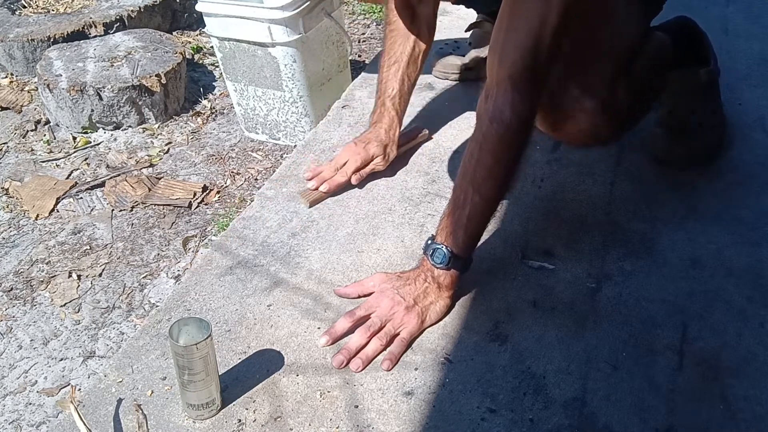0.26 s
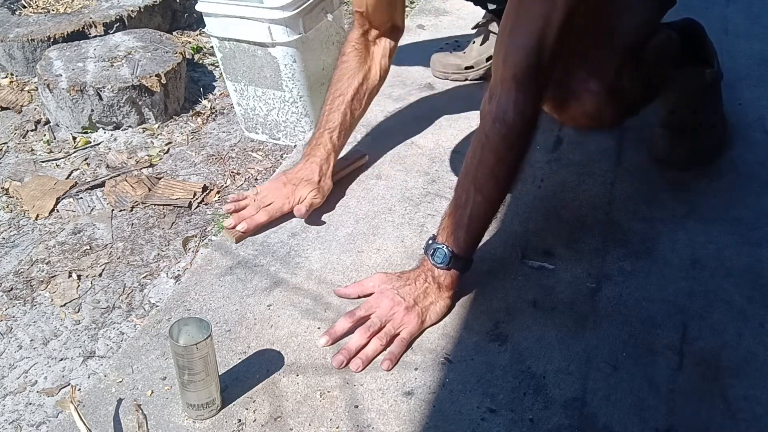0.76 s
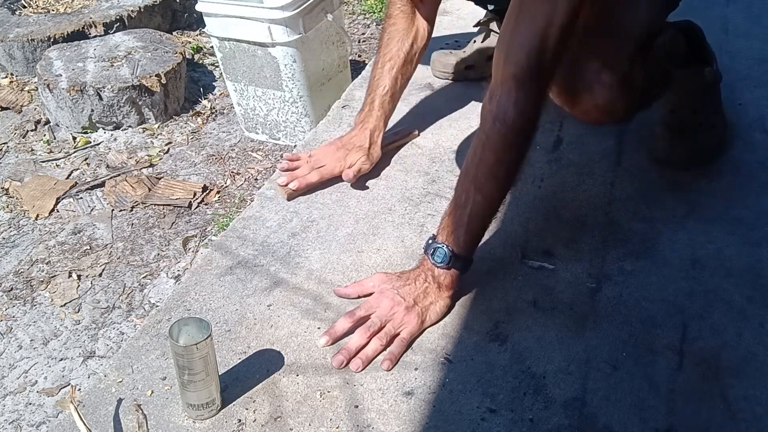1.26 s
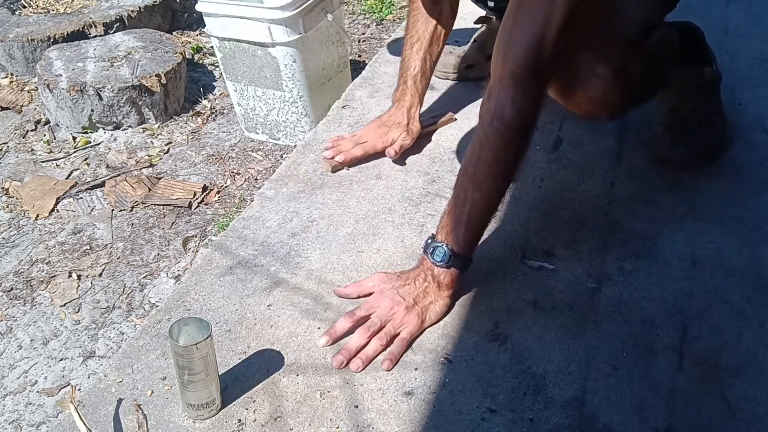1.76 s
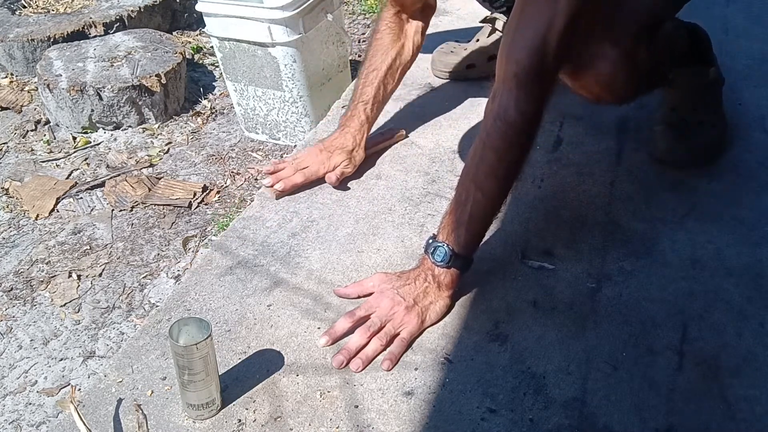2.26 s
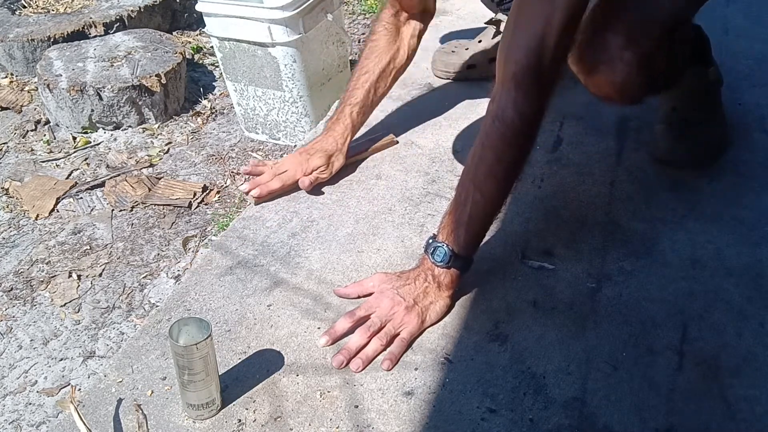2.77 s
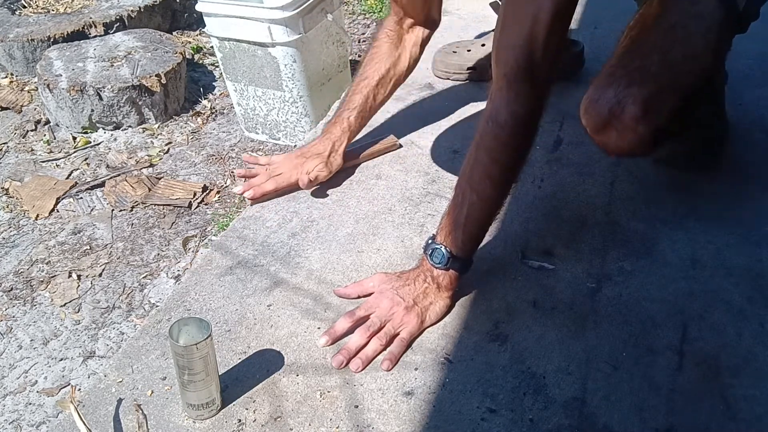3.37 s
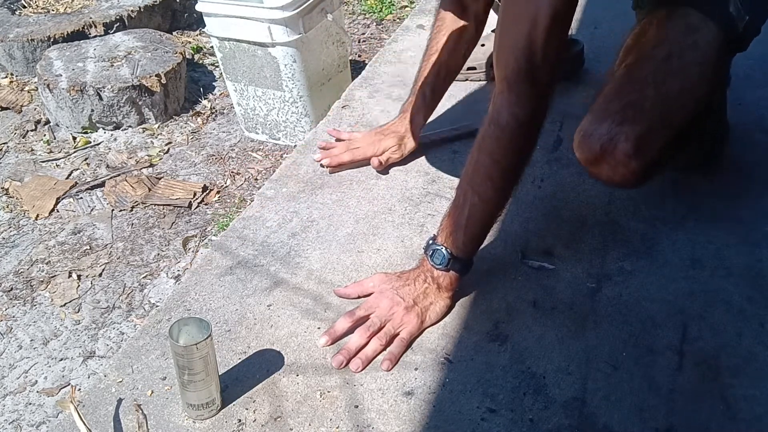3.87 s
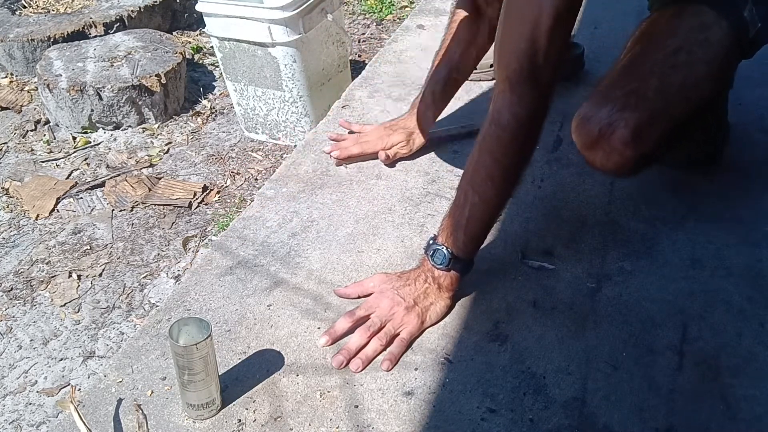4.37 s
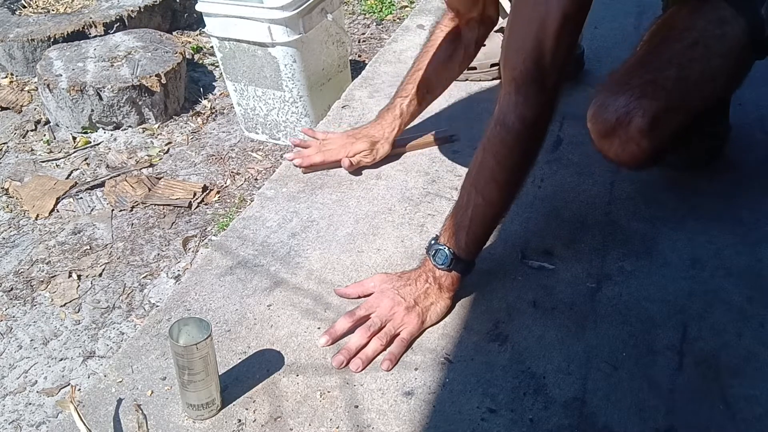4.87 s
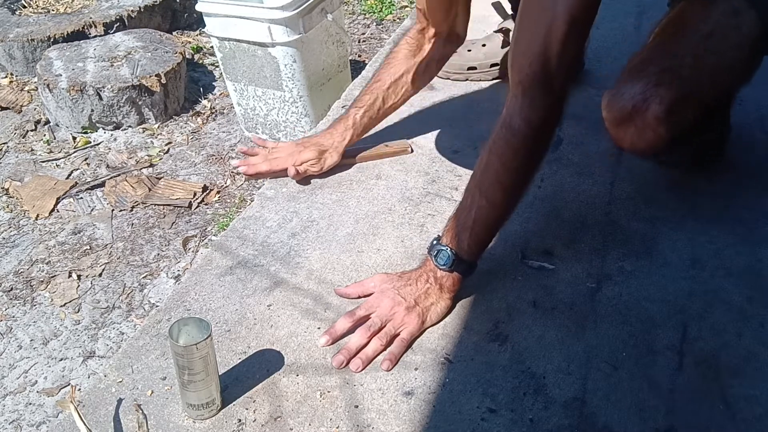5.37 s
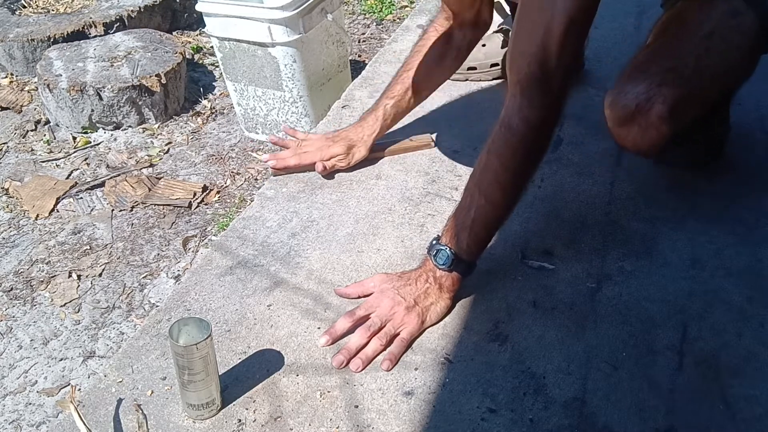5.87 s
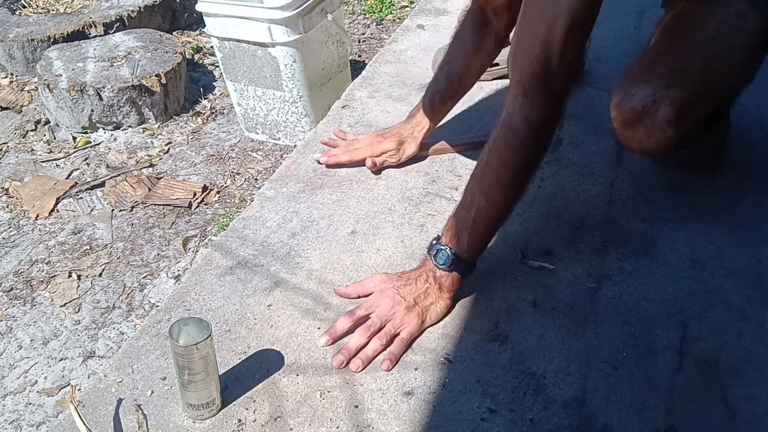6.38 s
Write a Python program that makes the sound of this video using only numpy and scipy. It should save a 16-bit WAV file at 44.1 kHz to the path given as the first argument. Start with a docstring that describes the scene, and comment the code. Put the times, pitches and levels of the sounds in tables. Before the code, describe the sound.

A board rubs to and fro on rough concrete in a yard, slightly right of centre and close to the microphone. The opening is loud and uneven: dry clacks, chattering wood, hissing grit, a few singing squeaks. Then the strokes turn soft, brisk and even, like fast sanding. One last knock and a longer scrape break in at the end. Low hum, quiet air and soft wind lie beneath.

```python
"""A short wooden board is pushed to and fro on a concrete slab, rolling a cotton wad to make fire by friction.
At first bare wood knocks and scrapes: each contact shakes ringing bends of the board, and loose grit hisses.
Then come about seven even rolls a second on the wad, and at the end a last knock and a few scrapes.
At times an edge sings or the air gap sounds hollow. A wall and bucket scatter it all, over hum, air and breeze.
Noise makes the rubbing, fading sines make the ringing. Table levels are those before the yard and microphone."""
import sys
import numpy as np
from scipy import signal
from scipy.fft import rfft, irfft
from scipy.io import wavfile

SR = 44100
rng = np.random.default_rng(int(sys.argv[2]) if len(sys.argv) > 2 else 0)


def store_wav(level_fs):
    """Save 16-bit WAV to argv[1]."""
    pcm = np.round(np.clip(np.atleast_2d(level_fs), -1, 1) * 32767)
    wavfile.write(sys.argv[1], SR, pcm.T.astype(np.int16))


N = 291942
TIME = np.arange(N) / SR


def undb(db):
    """Turn decibels into a gain."""
    return 10 ** (np.asarray(db) / 20)


def unit_rms(x):
    """Scale a sound to an rms of one."""
    return x / np.sqrt(np.mean(x ** 2))


def unit_energy(x):
    """Scale each channel to an energy (sum of squares) of one."""
    return x / np.sqrt(np.sum(x ** 2, axis=-1, keepdims=True))


def band(x, lo_hz, hi_hz, order=2):
    """Keep only the frequencies between two limits."""
    limits_hz = [lo_hz, min(hi_hz, 0.45 * SR)]
    return signal.sosfilt(signal.butter(order, limits_hz, "band", fs=SR, output="sos"), x)


def colour(x, points):
    """Shape the spectrum of a full-length sound by (frequency [Hz], level [dB]) points."""
    hz, db = np.transpose(points)
    bins_hz = np.maximum(np.fft.rfftfreq(N, 1 / SR), 1)
    gain = undb(np.interp(np.log(bins_hz), np.log(hz), db))
    return irfft(rfft(x) * gain, N)


def pair(size, alike):
    """Make left and right noise that share the part 'alike' of their power."""
    noise = rng.standard_normal((3, size))
    return np.sqrt(alike) * noise[0] + np.sqrt(1 - alike) * noise[1:]


def walk(rate):
    """Join random levels, 'rate' of them a second, by straight lines."""
    knots = rng.standard_normal(N // 8)
    return np.interp(TIME * rate, np.arange(len(knots)), knots)


def add(out, sound, s):
    """Mix a sound in at a time in seconds."""
    start = int(s * SR)
    part = sound[:, :N - start]
    out[:, start:start + part.shape[1]] += part


# Transformer hum, before its slow wavering:
# (frequency [Hz], rms level [dB], left minus right [dB])
HUM_TONES = [(55, -79, -19), (120.3, -54.5, 0), (252, -82, -13), (359.8, -58.5, -6.5)]
# Colour of the still outdoor air: (frequency [Hz], relative level [dB per Hz])
AIR_COLOUR = [(25, -9), (60, -12.5), (130, 1.5), (250, 0), (450, -4), (1000, -9), (2000, -14.5),
              (5000, -18.5), (8000, -28.5), (12000, -35), (16000, -42)]
# Strength of the breeze on the microphone, before the shared gain and gusts: (time [s], relative level [dB])
BREEZE_LEVELS = [(0.0, -81), (0.13, -68.5), (2.21, -71), (2.36, -56), (2.78, -71.5), (4.9, -65.5),
                 (5.36, -52.5), (6.62, -80)]


def background(air_db=-59, breeze_db=3, waver_db=3.5, gust_db=3.5):
    """Mains hum is a few wavering sines; still air and soft low gusts are shaped noise."""
    hum = 0
    for hz, db, pan_db in HUM_TONES:
        sides_db = np.array([[pan_db], [-pan_db]]) / 2
        tone = np.sqrt(2) * np.sin(2 * np.pi * (hz * TIME + rng.random()))
        hum = hum + undb(db + waver_db * walk(7.1) + sides_db) * tone
    air = undb(air_db) * unit_rms(colour(pair(N, 0.66), AIR_COLOUR))
    eddies = pair(N, 0.49)  # each microphone port meets partly its own eddies
    gusts = unit_rms(colour(eddies, [(20, -20), (40, -9), (60, 3), (90, 0), (160, -13.5), (400, -62)]))
    strength_db = np.interp(TIME, *np.transpose(BREEZE_LEVELS)) + gust_db * walk(42)
    return hum + air + undb(breeze_db + strength_db) * gusts


def stroke(s, swell_s, fade_s):
    """Contact grows and lets go as the hand passes: gives the samples covered and the strength at each."""
    span = np.flatnonzero((TIME > s - 3 * swell_s) & (TIME < s + 3 * fade_s))
    t = TIME[span] - s
    return span, np.exp(-(t / np.where(t < 0, swell_s, fade_s)) ** 2)


def grains(per_s, spread_db, bounce_hz, bounce_db, alike):
    """Sand grains of unequal size click in bunches as the board bounces."""
    caught = rng.random(N) < per_s / SR
    size = undb(spread_db * np.clip(rng.standard_normal(N), -2, 2))
    bounce = undb(bounce_db * walk(bounce_hz))
    return unit_rms(pair(N, alike) * caught * size * bounce)


def skips(skip_hz=95, uneven=0.4, release=3):
    """Stick-slip: the edge bites hard and lets go, over and over at an uneven pace."""
    phase = np.cumsum(skip_hz * np.exp(uneven * walk(skip_hz))) / SR
    return np.exp(-release * (phase % 1))


def bends(db, bright_db, shares):
    """Share a level among the three bends; brightness [dB per octave] favours the higher ones."""
    hz, share_db = np.transpose(shares)
    tilt_db = bright_db * np.log2(hz / hz[0])
    return db + 20 * np.log10(unit_energy(undb(share_db + tilt_db)))


# The thud, then the three bends of the board, each a flatwise and an edgewise mode with a damped crack.
# Each contact retunes the modes and scales their t60, the time to fade by 60 dB; tilt and place shift their levels:
# (flatwise [Hz], its t60 [s], edgewise [Hz], its t60 [s], edgewise over flatwise [dB],
#  crack from [Hz], crack to [Hz], crack over modes before cleaning [dB])
BOARD_MODES = [(570, 0.0031, 967, 0.033, 5.5, 504, 1200, 5), (1555, .028, 1940, .036, 0, 1350, 2450, -5),
               (3180, 0.013, 3540, 0.021, 7, 2750, 3950, -3.5),
               (4860, 0.017, 5300, 0.026, 3, 3990, 6080, -3)]


def ring(levels_db, edge_db, hold, crack_t60_s, detune, port_turn, upper_lean, clean_db=0, tuning=1):
    """A tap rings the board as fading sines plus a short noisy crack, slightly different each time."""
    size, place_db = 3000, 2
    t = np.arange(size) / SR
    out = 0
    for k, mode_row in enumerate(BOARD_MODES):
        flat_hz, flat_t60, edge_hz, edge_t60, lead_db, lo_hz, hi_hz, crack_db = mode_row
        # the tilt of the board picks the plane in which it bends, in full only in the first bend
        lean_db = lead_db + edge_db * (1 if k == 1 else upper_lean)
        modes = 0
        for hz, t60, db in (flat_hz, flat_t60, 0), (edge_hz, edge_t60, lean_db):
            own_hz = tuning * hz * (1 + detune * rng.standard_normal())
            # short waves reach the two microphone ports more out of step
            phase = port_turn * hz / 2000 * rng.standard_normal((2, 1))
            tone = np.sin(2 * np.pi * own_hz * t + phase) * undb(-60 * t / (t60 * hold))
            # the place of contact favours some modes over others
            own_db = db + place_db * rng.standard_normal()
            modes = modes + undb(own_db) * unit_energy(tone)
        crack = band(pair(size, 0.85) * undb(-60 * t / crack_t60_s), lo_hz, hi_hz, order=3)
        bend = unit_energy(modes) + undb(crack_db - clean_db) * unit_energy(crack)
        bend = band(bend, 1.05 * lo_hz, 1.186 * hi_hz, order=3)
        out = out + undb(levels_db[k]) * unit_energy(bend)
    return out


def drag(contacts, shares, edge_db, thud_db, thud_growth, hold, detune, clean_db):
    """Wood on concrete: light contacts rub evenly; pressed harder, the wood skips, chatters and thuds more."""
    chatter_from_db, chatter_range_db = -44, 16
    out = np.zeros((2, N))
    rub = grains(per_s=5100, spread_db=0.5, bounce_hz=112, bounce_db=7.5, alike=0.6)
    bites = grains(per_s=9000, spread_db=1, bounce_hz=89, bounce_db=2, alike=0.77)
    chatter = unit_rms(skips() * bites)
    for s, swell_s, fade_s, db, bright_db, tuning in contacts:
        span, contact = stroke(s, swell_s, fade_s)
        pressure_db = db - chatter_from_db
        skip = np.clip(pressure_db / chatter_range_db, 0, 1)  # 0 rubs evenly, 1 only chatters
        force = contact * (np.sqrt(skip) * chatter[:, span] + np.sqrt(1 - skip) * rub[:, span])
        levels_db = [thud_db + thud_growth * pressure_db, *bends(db, bright_db, shares)]
        body = ring(levels_db, edge_db, hold, crack_t60_s=0.035, detune=detune, port_turn=0.44,
                    upper_lean=0.69, clean_db=clean_db, tuning=tuning)
        wood = unit_energy(signal.fftconvolve(force, body, axes=1))
        # the energy of a scrape is set by its length and pressure
        add(out, undb(db) * np.linalg.norm(contact) * wood, TIME[span[0]])
    return out


# Basic colour of the hiss of sliding grit: (frequency [Hz], relative level [dB])
GRIT_COLOUR = [(380, -16), (550, -13), (1100, -11), (2000, -3), (4000, 12), (5500, 14.5), (6600, 1.5),
               (7450, 5.5), (8800, -2), (10000, 4.5), (13500, -18), (15000, -13.5), (16500, -34)]


def slide(passes, paths_t60_s=0.0081, brisk_db=-51, brighten=0.14):
    """Fine grit hisses as filtered clicks, most at the fastest part of a stroke; brisk strokes are brighter."""
    size = 800
    out = np.zeros((2, N))
    clicks = grains(per_s=4500, spread_db=2, bounce_hz=120.9, bounce_db=4.5, alike=0.086)
    hiss = colour(clicks, GRIT_COLOUR)
    hiss = hiss / np.std(band(hiss, 8000, 16000, order=4))  # levels count in this band
    top = colour(hiss, [(8000, -49), (12000, -20)])
    for s, swell_s, fade_s, db in passes:
        span, speed = stroke(s, swell_s, fade_s)
        extra_top = undb(brighten * (db - brisk_db)) - 1
        grit = hiss[:, span] + extra_top * top[:, span]
        # the hiss escapes between board, hand and slab by paths that change with each stroke
        paths = unit_energy(pair(size, 0.55) * undb(-60 * TIME[:size] / paths_t60_s))
        add(out, undb(db) * signal.fftconvolve(speed * grit, paths, axes=1), TIME[span[0]])
    return out


# How the three bends share the energy with bare wood on the slab: (frequency [Hz], relative level [dB])
BARE_BEND_SHARES = [(1750, 0.5), (3350, 2.5), (5050, -5.5)]
# Bare wood drags over the slab; the grit swells and fades a little faster than the wood:
# (time of hardest contact [s], wood swell [s], wood fade [s], wood level at hardest contact [dB],
#  brightness [dB per octave], grit level at its peak, before brightening [dB])
SCRAPE_STROKES = [(0.049, 0.057, 0.013, -24, 7.5, -43), (0.185, .055, 0.031, -24.5, 7, -48.5),
                  (0.305, .022, 0.071, -51, 8, -74), (0.396, 0.0079, .03, -34, -10, -75),
                  (0.482, 0.0042, 0.043, -28.5, 0.5, -39), (0.592, 0.03, 0.046, -27.5, 0.5, -42),
                  (0.762, 0.034, 0.027, -33.5, 6, -52.5), (0.9, 0.032, 0.029, -26, 7, -57.5),
                  (1.027, .045, 0.061, -37.5, 0.5, -71), (1.182, 0.012, 0.039, -28.5, 8.5, -55.5),
                  (1.325, .022, 0.046, -32.5, 10.5, -59), (1.475, .016, 0.022, -49.5, 3, -78),
                  (1.553, .005, 0.016, -33, 4, -55.5), (1.645, 0.046, 0.035, -31.5, 1, -54.5),
                  (1.838, 0.022, 0.018, -37, 6, -64), (1.933, 0.017, .008, -38, 19, -70),
                  (1.968, 0.026, 0.02, -30.5, 2, -51.5), (2.202, 0.0073, 0.025, -31, 3, -66),
                  (2.244, 0.021, 0.027, -30, 9, -47), (2.528, 0.036, 0.028, -33.5, -1.5, -45),
                  (2.815, 0.047, 0.037, -37.5, 11, -62), (2.939, 0.011, 0.036, -26.5, 2.5, -39.5),
                  (3.091, 0.027, 0.041, -31, 6, -58), (3.235, 0.011, 0.047, -53, 1, -61),
                  (3.395, 0.029, 0.051, -40.5, 3.5, -51.5), (3.549, 0.025, 0.035, -24, 5.5, -42.5),
                  (3.678, 0.023, 0.059, -30, 13, -56.5), (3.731, 0.011, 0.029, -34, -2, -48.5),
                  (3.819, 0.01, 0.049, -56, -14, -55), (3.892, 0.011, 0.0066, -38.5, -7.5, -57),
                  (6.373, 0.0049, 0.029, -26, 1.5, -59), (6.484, 0.017, 0.028, -29.5, 3.5, -60),
                  (6.594, 0.033, .15, -22.5, 6.5, -40.5)]


def scrapes(skid_db=-45, skid_swell_s=0.0054, skid_fade_s=0.035, skid_lag_s=0.016, grit_length=0.87):
    """Each scrape rings the wood and sweeps grit along; after a knock the board skids on briefly."""
    drags, passes, skids = [], [], []
    for s, swell_s, fade_s, wood_db, bright_db, grit_db in SCRAPE_STROKES:
        drags.append((s, swell_s, fade_s, wood_db, bright_db, 1))
        passes.append((s, grit_length * swell_s, grit_length * fade_s, grit_db))
    for s, db, bright_db, _, _ in KNOCK_HITS:
        skids.append((s + skid_lag_s, skid_swell_s, skid_fade_s, db + skid_db, bright_db, 1))
    wood = drag(drags, BARE_BEND_SHARES, edge_db=10, thud_db=-62.5, thud_growth=0.43,
                hold=1.02, detune=0.02, clean_db=0)
    skidding = drag(skids, BARE_BEND_SHARES, edge_db=1, thud_db=-63, thud_growth=0.91,
                    hold=2, detune=0.0155, clean_db=2.5)
    return wood + skidding + slide(passes)


# The air gap under board and palm glides in pitch as it opens or closes:
# (middle time [s], half length [s], pitch going in [Hz], pitch going out [Hz], level at the middle [dB])
HOLLOW_GLIDES = [(0.162, 0.047, 763, 1018, -40.5), (0.507, .025, 640, 623, -44),
                 (0.585, 0.036, 1782, 2423, -26), (0.602, .02, 620, 570, -49),
                 (0.879, 0.037, 2100, 3040, -33.5), (1.184, 0.027, 1976, 3300, -29),
                 (1.372, 0.02, 540, 490, -48), (1.43, 0.027, 801, 890, -50),
                 (1.673, 0.047, 998, 637, -46.5), (1.985, 0.015, 560, 508, -46),
                 (2.256, .02, 570, 502, -54), (2.55, .03, 538, 501, -53.5), (2.89, 0.017, 877, 846, -50),
                 (3.09, 0.0306, 620, 674, -55), (3.237, .015, 2000, 2700, -33.5),
                 (3.543, 0.024, 2080, 2468, -26.5), (3.739, 0.013, 2410, 2340, -29.5),
                 (3.836, 0.016, 2280, 2460, -32), (6.385, .02, 548, 515, -42),
                 (6.483, 0.026, 2238, 2445, -31.5), (6.598, .035, 600, 568, -47),
                 (6.604, .03, 2293, 2473, -27)]


def hollows(width=0.26, alike=0.79, rasp=0.71):
    """Rubbing stirs the air gap into a narrow band that glides, then settles; the skipping wood breaks it up."""
    out = np.zeros((2, N))
    stir = (pair(N, alike) + 1j * pair(N, alike)) * skips() ** rasp
    for s, half_s, from_hz, to_hz, db in HOLLOW_GLIDES:
        span, contact = stroke(s, half_s, half_s)
        progress = np.clip(0.5 + 0.5 * (TIME[span] - s) / half_s, 0, 1)
        hz = from_hz * (to_hz / from_hz) ** progress
        # slow noise, moved up to the gliding pitch, becomes a narrow band around it
        lowpass = signal.butter(2, 0.5 * width * from_hz, fs=SR, output="sos")
        flutter = signal.sosfilt(lowpass, stir[:, span])
        carrier = np.exp(2j * np.pi * np.cumsum(hz) / SR)
        tone = unit_energy(contact * np.real(flutter * carrier))
        add(out, undb(db) * np.linalg.norm(contact) * tone, TIME[span[0]])
    return out


# A long edge catches and sings in the first edgewise bend:
# (time of hardest contact [s], half length [s], pitch before slight detuning [Hz], level at hardest contact [dB])
EDGE_CATCHES = [(0.122, 0.018, 1950, -26), (0.178, 0.014, 1924, -14.5), (0.224, 0.021, 1896, -29),
                (0.297, .03, 1903, -46), (.507, 0.024, 1888, -19), (0.583, 0.042, 1945, -27),
                (1.335, 0.015, 1614, -41), (2.208, 0.013, 1880, -35), (2.484, 0.016, 1882, -35),
                (2.814, 0.051, 1935, -33), (3.095, 0.049, 1924, -27), (3.164, 0.02, 1947, -38),
                (3.965, 0.015, 1790, -35.5), (4.26, .02, 1874, -35.5), (4.453, 0.022, 1630, -51.5),
                (4.558, 0.034, 1594, -43.5), (4.703, 0.02, 1640, -48), (4.822, 0.047, 1835, -43.5),
                (4.98, 0.017, 1800, -40.5), (5.255, 0.027, 1680, -48), (5.554, 0.0067, 1840, -34),
                (5.696, 0.0097, 1994, -35), (6.238, 0.032, 1884, -39)]


def catches(bright_db=-16):
    """Tipped on its edge, the board rings mainly in one mode; the load of the palm sets its pitch."""
    _, _, free_hz, *_ = BOARD_MODES[1]
    contacts = [(s, half_s, half_s, db, bright_db, hz / free_hz) for s, half_s, hz, db in EDGE_CATCHES]
    return drag(contacts, BARE_BEND_SHARES, edge_db=41, thud_db=-74, thud_growth=0.7,
                hold=1.11, detune=0.0025, clean_db=13)


# The board strikes the slab, levels before the tick and rebounds are added:
# (time [s], energy level of the bends [dB], brightness [dB per octave], energy level of the thud [dB],
#  extra edgewise over flatwise in the first bend [dB])
KNOCK_HITS = [(0.1044, 10, 2, -7.5, 12), (0.3926, 5.5, 0, -19, -6), (0.4801, 7, -9, -22, 25),
              (0.6105, 0.5, 3, -32, 1), (0.688, 8.5, -1, -33, 6), (0.7317, -4, 4, -41, 14),
              (0.7573, 0.5, 9, -45, 6), (0.8125, 7.5, -6, -13.5, 2), (0.9698, 6, 3, -25, -7),
              (1.098, 5.5, -8.5, -20.5, 4), (1.2564, -1, -5, -24, -7), (1.4033, -6.5, -20, -7, 37),
              (1.548, -4.5, -6, -22.5, -19), (1.6317, 4, 7, -18, -12), (1.72, -16, -13, -20.5, 25),
              (1.823, -9, 6.5, -52, -20), (1.8563, -7, 11, -51, 16), (2.145, -2.5, 1.5, -24.5, -1.5),
              (2.4062, -12, 0.5, -40, -5), (2.7241, -7, 18, -29, 30), (2.867, -7, -11, -23.5, 25),
              (2.935, 6.5, 2, -46, 36), (3.0259, 9.5, -7, -8.5, 13), (3.151, -2, -3, -29, 24),
              (3.2363, -7, 4, -50, 23), (3.2455, -4.5, 26, -52, 24), (3.327, 8, 1, -37, -50),
              (3.6472, 10.5, 12, -28, -28), (3.7354, -2.5, 6, -45, -41), (3.826, -18, -18, -26, 23),
              (3.8852, -9, -4.5, -21.5, -11), (6.3755, 5.5, 1.5, -16, 13)]


def knocks(tick_db=-29, tick_t60_s=0.013, settle_db=-9, settle_t60_s=0.12):
    """An edge drops on the slab: a short ring, a tick of crushed grit, and tiny rebounds as it settles."""
    out = np.zeros((2, N))
    for s, db, bright_db, thud_db, edge_db in KNOCK_HITS:
        levels_db = [thud_db, *bends(db, bright_db, BARE_BEND_SHARES)]
        wood = ring(levels_db, edge_db, hold=0.91, crack_t60_s=0.012, detune=0.009,
                    port_turn=0.73, upper_lean=0.1)
        t = TIME[:wood.shape[1]]
        tick = unit_energy(band(pair(len(t), 0.2) * undb(-60 * t / tick_t60_s), 7200, 11500))
        hit = wood + undb(levels_db[-1] + tick_db) * tick
        # cubed noise is spiky, like a run of small taps
        rebounds = rng.standard_normal(len(t)) ** 3 * undb(-60 * t / settle_t60_s)
        taps = undb(settle_db) * unit_energy(rebounds)
        taps[0] = 1  # the knock itself
        add(out, signal.fftconvolve(hit, taps[None], axes=1), s)
    return out


# How the three bends share the energy with the board on the wad: (frequency [Hz], relative level [dB])
WAD_BEND_SHARES = [(1750, -0.5), (3350, 1.5), (5050, 4.5)]
# The board rides on the wad, one even stroke each way:
# (time of hardest contact [s], wood level then [dB], grit level at its peak, before brightening [dB])
ROLL_STROKES = [(4.005, -38.5, -47.5), (4.146, -41.5, -49), (4.287, -40.5, -52), (4.43, -42.5, -57.5),
                (4.573, -50.5, -52), (4.69, -41, -56), (4.836, -39.5, -46.5), (4.98, -42, -58),
                (5.122, -41, -48), (5.254, -38.5, -49.5), (5.39, -38.5, -52), (5.54, -37.5, -47.5),
                (5.686, -34, -49), (5.823, -39.5, -48), (5.963, -40.5, -52.5), (6.086, -40, -53),
                (6.225, -46, -60.5), (6.348, -37, -50.5)]


def rolls(swell_s=0.041, fade_s=0.034, grit_swell_s=0.029, grit_fade_s=0.031):
    """Every roll has the same shape: the grit hiss peaks first, then the wood as the hand bears down."""
    grit_lead_s = 0.013  # top speed comes just before the hardest contact
    scatter_db = 1  # brightness [dB per octave] differs from roll to roll
    contacts, passes = [], []
    for s, wood_db, grit_db in ROLL_STROKES:
        contacts.append((s, swell_s, fade_s, wood_db, scatter_db * rng.standard_normal(), 1))
        passes.append((s - grit_lead_s, grit_swell_s, grit_fade_s, grit_db))
    wood = drag(contacts, WAD_BEND_SHARES, edge_db=1.5, thud_db=-59, thud_growth=0.7,
                hold=1.18, detune=0.045, clean_db=1.5)
    return wood + slide(passes)


def yard(dry, wet_db=-9, t60_s=0.13, gap_s=0.0017):
    """The wall, bucket and body throw back a short fading scatter, duller than the direct sound."""
    size = 16000
    t = np.arange(size) / SR
    onset = np.clip(t / gap_s - 1, 0, 1)  # silent for one gap, full after two
    tail = unit_energy(pair(size, 0.028) * undb(-60 * t / t60_s) * onset)
    scatter = signal.fftconvolve(dry, tail, axes=1)[:, :N]
    return dry + undb(wet_db) * colour(scatter, [(500, 2.5), (2000, 2.5), (5500, -1.5), (10000, -11)])


def scene(port_lag_s=4.2e-5):
    """The board lies a little to the right, so the left microphone port hears it later."""
    left, right = scrapes() + hollows() + catches() + knocks() + rolls()
    delay = np.exp(-2j * np.pi * np.fft.rfftfreq(N, 1 / SR) * port_lag_s)
    late_left = irfft(rfft(left) * delay, N)
    return background() + yard(np.array([late_left, right]))


def record(dry, top_hz=16300):
    """The left port is brighter at the very top than the right; the treble ends steeply."""
    left = colour(dry[0], [(4000, -5), (8000, -0.5), (11000, 6), (15000, 15.5)])
    right = colour(dry[1], [(4000, -5), (8000, 3), (11000, -5), (15000, 7)])
    lowpass = signal.ellip(8, 0.2, 70, top_hz, fs=SR, output="sos")
    return signal.sosfilt(lowpass, np.array([left, right]))


dry = scene()
out = record(dry)
store_wav(out)
```